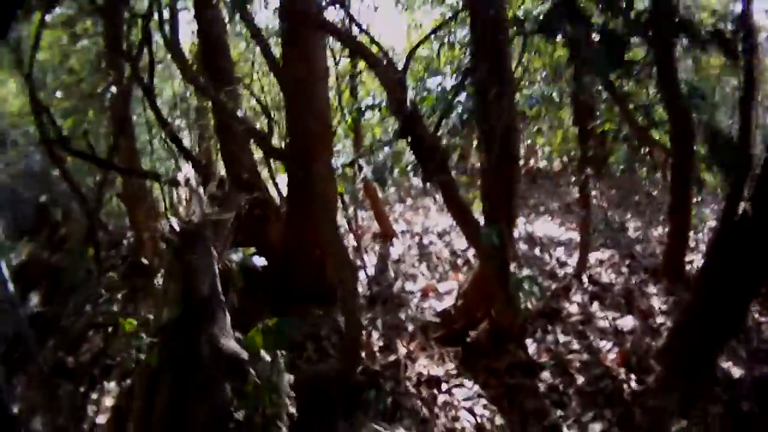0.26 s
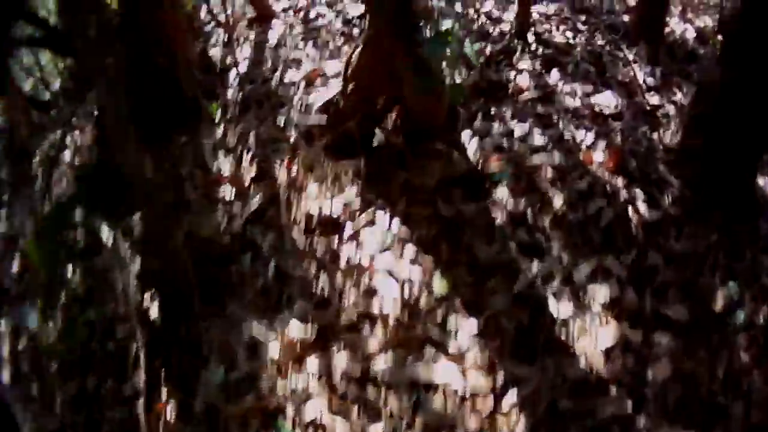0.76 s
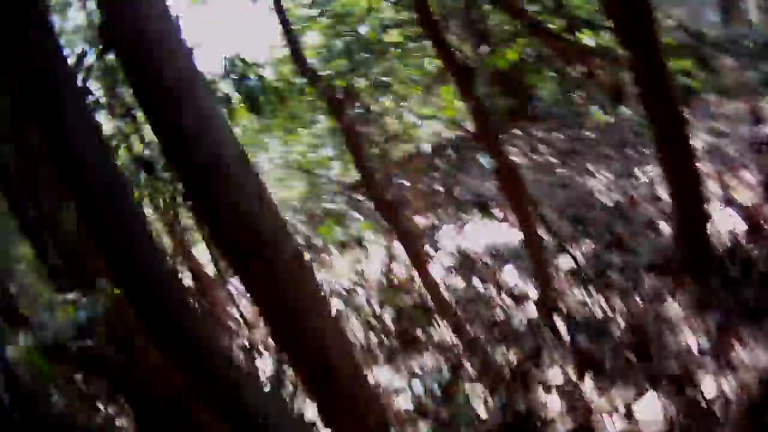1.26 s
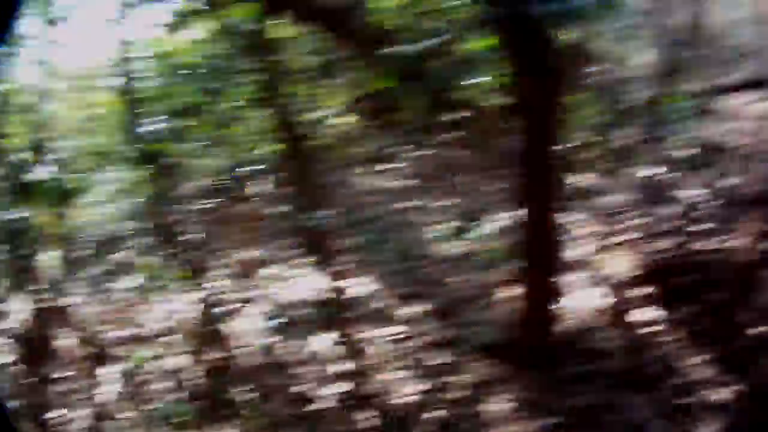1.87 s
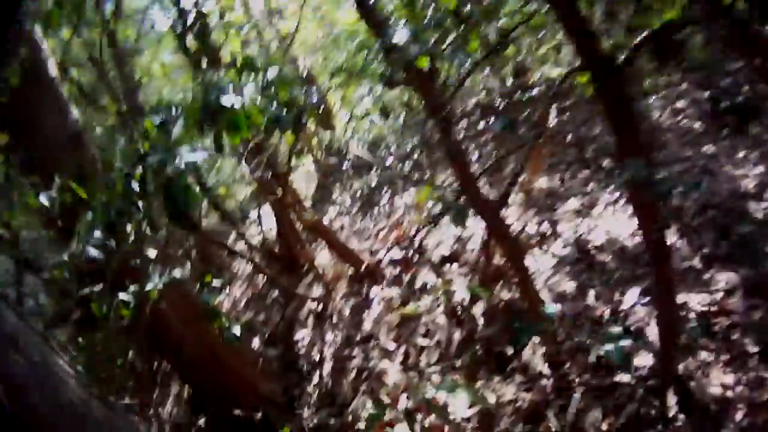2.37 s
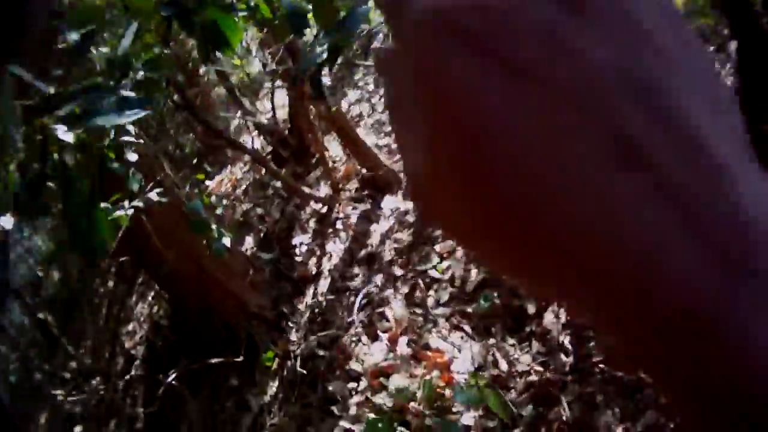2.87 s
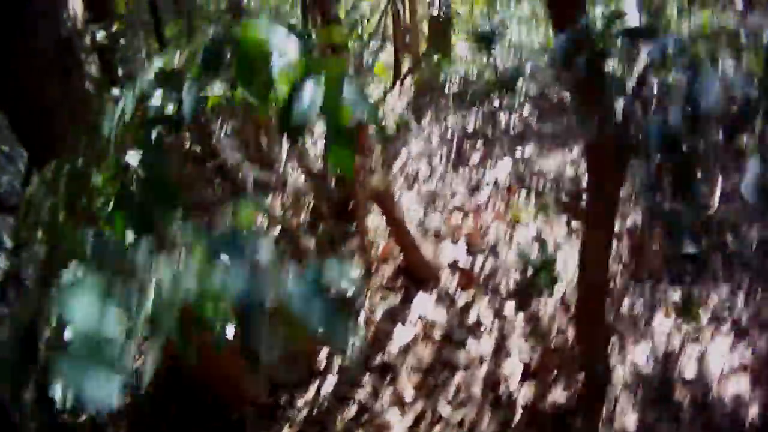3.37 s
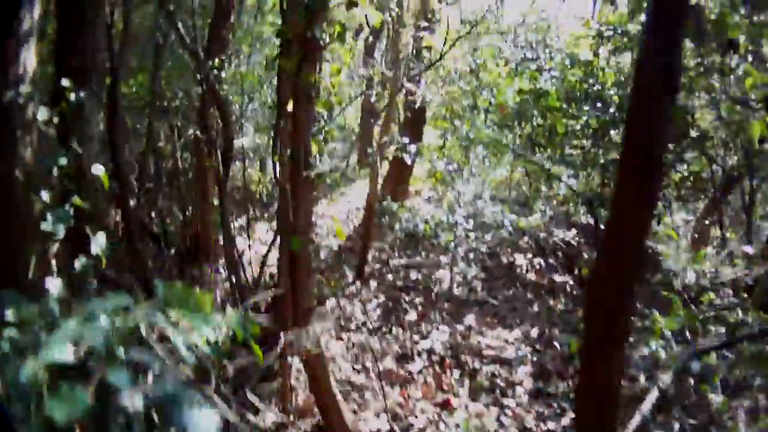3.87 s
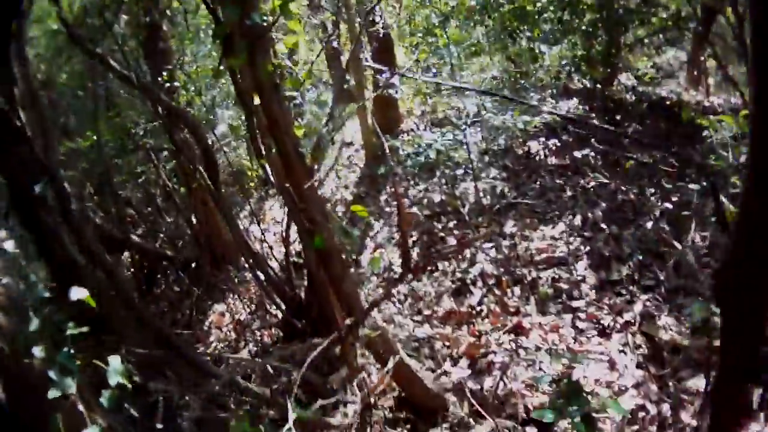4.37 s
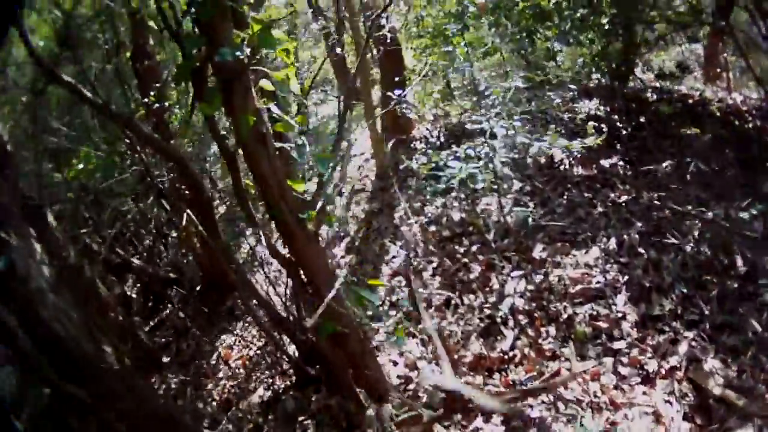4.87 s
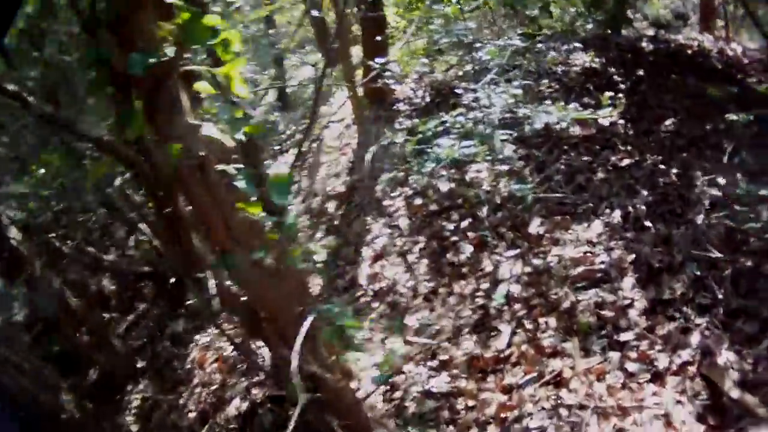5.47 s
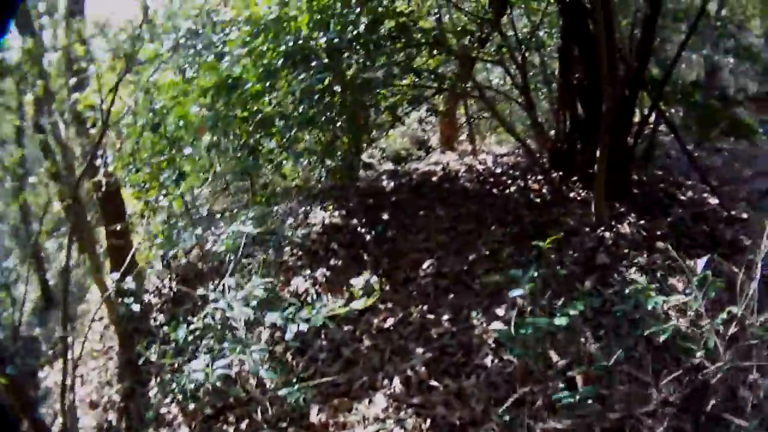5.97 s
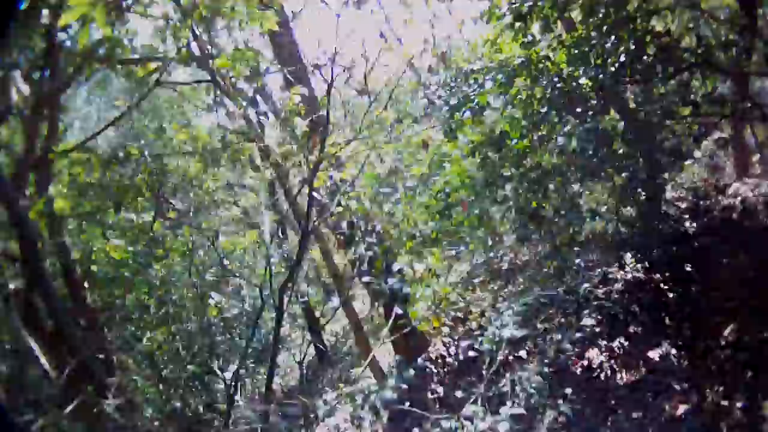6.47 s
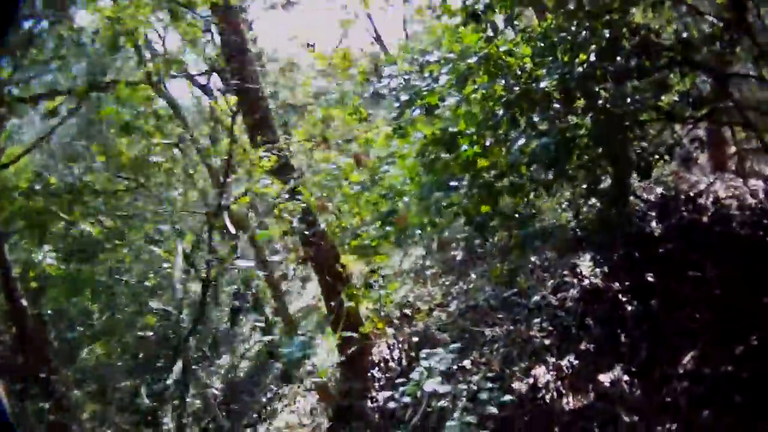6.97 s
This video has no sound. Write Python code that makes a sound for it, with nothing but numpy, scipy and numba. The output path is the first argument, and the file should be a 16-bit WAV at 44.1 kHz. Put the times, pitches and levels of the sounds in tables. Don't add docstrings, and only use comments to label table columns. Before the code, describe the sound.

Someone walks haltingly over crackling leaf litter, close up, as a twig breaks loudly, a stick knocks, and a bright stalk snaps later.

```python
import sys
import numpy as np
from scipy import signal
from scipy.fft import rfft, irfft
from scipy.io import wavfile
from scipy.ndimage import uniform_filter1d
from numba import njit

SR = 44100
rng = np.random.default_rng(int(sys.argv[2]) if len(sys.argv) > 2 else 0)


def transcribe(signal):
    frames = np.atleast_2d(signal).T
    limited = np.clip(frames, -1, 1)
    pcm = np.round(limited * 32767).astype(np.int16)
    wavfile.write(sys.argv[1], SR, pcm)


def volts(x):
    e = np.asarray(x, float) / 20
    return 10 ** e


N = 318679
HIT_SAMPLES = 2048


def band(x, lo_hz, hi_hz, order=2):
    edges_hz = [lo_hz, min(hi_hz, 0.45 * SR)]
    return signal.sosfilt(signal.butter(order, edges_hz, "bandpass", fs=SR, output="sos"), x)


def edge(x, hz, kind, order=4):
    return signal.sosfilt(signal.butter(order, hz, kind, fs=SR, output="sos"), x)


def ring(x, hz, width_hz):
    return signal.lfilter(*signal.iirpeak(hz, hz / width_hz, fs=SR), x)


def unit_rms(x):
    return x / np.sqrt(np.mean(x ** 2))


def set_peak(x, db):
    return x * volts(db) / np.max(np.abs(x))


def add(out, start_s, x):
    i = int(start_s * SR)
    out[i:i + len(x)] += x[:len(out) - i]


def walk(rate_hz):
    hold = int(SR / rate_hz)
    levels = np.repeat(rng.standard_normal(N // hold + 1), hold)
    return 1.28 * uniform_filter1d(levels, hold)[:N]


def curve(table):
    s, *columns = np.transpose(table)
    return [np.interp(np.arange(N) / SR, s, column) for column in columns]


def presses(rows, floor_db):
    ms = np.arange(N) / SR * 1000
    power = volts(floor_db) ** 2
    for s, db, rise_ms, hold_ms, fall_ms in rows:
        since = ms - 1000 * s
        rising = -since / max(rise_ms, 2)
        falling = (since - hold_ms) / max(fall_ms, 2)
        away = np.clip(np.maximum(rising, falling), 0, 12)
        power = power + volts(db - 10 * away) ** 2
    return np.sqrt(power)


def without_hold(rows):
    return [(s, db, rise_ms, 0, fall_ms) for s, db, rise_ms, fall_ms in rows]


@njit
def grains(start, hz, cycles, size):
    out = np.zeros(N + 4096)
    for g in range(len(start)):
        turn = np.exp((2j * np.pi - 1 / cycles[g]) * hz[g] / SR)
        z = size[g] + 0j
        for i in range(start[g], start[g] + min(int(6 * cycles[g] * SR / hz[g]), 4096)):
            z *= turn
            out[i] += z.imag
    return out[:N]


def crackle(count, spread_db, cycles):
    when, pitch, big, sign = rng.random((count, 4)).T
    hz = 200 * 78 ** pitch
    loud_db = np.minimum(-spread_db * np.log(big + 1e-9), 15)
    size = np.sqrt(hz) * volts(loud_db) * np.sign(sign - 0.5)
    return grains((when * N).astype(np.int64), hz, cycles * (0.5 + sign), size)


def colour(x, points):
    spectrum, f = rfft(x), np.arange(N // 2 + 1) * SR / N + 1
    own = np.sqrt(uniform_filter1d(np.abs(spectrum) ** 2, size=3000))
    hz, db = np.transpose(points)
    return irfft(spectrum / own * volts(np.interp(np.log(f), np.log(hz), db)), N)


# frequency in Hz, level in dB per Hz.
LEAF_TONE = [(71, -53), (120, -22), (412, -5.5), (725, -10.5), (1410, -4.5), (1590, -8), (1870, -6.5),
             (2640, -1.5), (4650, -3), (6690, -7), (7700, -9.5), (8520, -6.5), (15000, -7)]
# full weight in seconds, crunch in dB, rise by 10 dB in ms,
# hold in ms, fall by 10 dB in ms.
STEPS = [(0.471, -37, 29, 59, 33), (0.591, -48, 60, 16, 200), (0.934, -31, 16, -29, 88),
         (1.157, -31.5, -10, 45, 64), (1.19, -27.5, 13, 67, 31), (1.293, -42, 30, -4, 122),
         (2.035, -36, 26, 83, 55), (2.714, -41, 97, 6, 75), (3.033, -33.5, 29.5, 54, 18),
         (3.135, -48, 4, 36, 60), (3.193, -34, 67, 0, 190), (3.32, -34.5, 13, 0, 65),
         (3.496, -38.5, 196, 4, 400), (3.831, -30.5, 47, 25, 82), (3.911, -38.5, 60, 57, 200),
         (4.558, -32.5, 58, 1, 20), (4.629, -29, 54, 61, 90), (5.292, -41, 344, 3, 22),
         (5.476, -29.5, 22.5, 12, 150), (5.636, -26, 11, 1, 31), (3.44, -45, 33, -2, 20),
         (6.09, -36, 125, -2, 58), (6.335, -30, 99, 24, 83), (7.226, -37, 19, 0, 50)]
# peak in seconds, crunch in dB, rise by 10 dB in ms, fall by 10 dB in ms.
SCUFFS = [(0.208, -52, 300, 33), (0.275, -53, 17, 300), (0.83, -44, 400, 38), (1.094, -42, 40, 31),
          (1.86, -52.5, 126, 84), (2.2, -55.5, 60, 204), (2.57, -44.5, 261, 300), (4.182, -48, 150, 200),
          (4.454, -44.5, 300, 60), (4.8, -42, 43, 369), (5.795, -41.5, 132, 109), (5.915, -56, 27, 58),
          (6.665, -43.5, 64, 250), (6.936, -45.5, 250, 200), (7.056, -48, 63, 250)]
# time in seconds, rustle in dB, crisp share of thin leaves in dB.
RUSTLE = [(0, -67, -3), (0.25, -62, -0.5), (0.5, -42, -5.5), (0.95, -58, -5), (1.25, -39, -1.5),
          (1.45, -49, -5), (1.77, -53, -2.5), (1.96, -56.5, -1.5), (2.17, -46.5, -1), (2.9, -70, -4.5),
          (3.1, -75, 0), (3.85, -41.5, -1.5), (4.3, -47.5, -4.5), (4.7, -72, -2), (5.2, -40.5, -4),
          (5.85, -62, -2), (6.5, -44, -2.5), (7.23, -66, -2.5)]
# time in seconds, thump in dB, rise by 10 dB in ms,
# fall by 10 dB in ms.
SINKS = [(0.59, -55, 100, 58), (1.16, -50, 8, 30), (1.253, -37.5, 31, 14), (1.76, -51.5, 50, 147),
         (2.0, -53, 12, 150), (2.89, -51.5, 5, 120), (3.04, -65, 58, 97), (4.0, -47, 205, 110),
         (4.18, -39, 6, 64), (4.477, -38, 7, 31), (4.635, -39, 12, 15), (4.95, -63, 200, 300),
         (5.49, -43, 28, 107), (5.635, -39.5, 23, 57), (6.338, -40.5, 96, 127), (7.0, -58, 300, 300),
         (7.226, -48, 30, 47)]


def leaves():
    split_hz = 7500
    rustle_db, crisp_db = curve(RUSTLE)
    crunch = presses(STEPS + without_hold(SCUFFS), rustle_db)
    lone = unit_rms(colour(crackle(count=30000, spread_db=3.0, cycles=2.9), LEAF_TONE[:-1]))
    blur = unit_rms(colour(rng.standard_normal(N), LEAF_TONE[:-1]))
    slips = volts(1.38 * walk(60) + 1.0 * walk(150))
    bed = edge((lone + volts(3.0) * blur) * slips, 16500, "low", order=8)

    thump = unit_rms(band(bed, 82, 1596, order=3)) * volts(0.17 * walk(25))
    body = unit_rms(band(bed, 1730, split_hz, order=4))
    crisp = unit_rms(edge(bed, split_hz, "high")) * volts(crisp_db + 1.27)
    weight = np.hypot(volts(-14.5) * crunch, presses(without_hold(SINKS), floor_db=-60))
    return crunch * (body + crisp) + weight * thump


# frequency in Hz, width in Hz, level in dB.
WOOD = [
    (425, 244, 5),
    (1160, 1300, 2),
    (241, 210, 5),
    (750, 1600, -31),
]


def crack(hz, wood_db, crisp_db, swell_ms, decay_ms, after_db):
    ms = np.arange(HIT_SAMPLES) / SR * 1000
    decay_ms = np.clip(decay_ms, 0.2, 4)
    swell = np.exp(np.minimum(ms / swell_ms - 4, 0))
    late = np.maximum(ms - 4 * swell_ms, 0)
    fall = np.exp(-late / decay_ms) + volts(after_db) * np.exp(-late / 3.9)
    burst = swell * fall * rng.standard_normal(HIT_SAMPLES)

    broad_ring = ring(ring(burst, hz, 0.21 * hz), hz, 1.7 * hz)
    voice = set_peak(broad_ring, 0) + set_peak(band(burst, 1840, 5800), -1.3)
    modes = sum(volts(db) * ring(burst, f, width) for f, width, db in WOOD)
    wood = edge(modes, 306, "high", order=3)
    crisp = band(burst, 7000, 13800)
    return set_peak(voice, 0) + set_peak(crisp, crisp_db) + set_peak(wood, wood_db)


# time in seconds, peak in dB, ring in Hz, wood share in dB,
# crisp share in dB.
STALKS = [(0.5978, -19, 3550, -5.5, -13), (0.9276, -9.5, 5640, -12, -0.5), (1.3743, -23.5, 2260, -11, 7),
          (1.6625, -29, 5300, -14, -10), (1.998, -33.5, 1370, -0.5, -17), (2.5532, -21, 6000, -7, 6.5),
          (3.8322, -12, 7240, -37, 14), (3.9888, -21, 2940, -7.5, 4), (4.5484, -16, 5700, -38, -8),
          (4.6804, -15, 1220, -9, 3), (4.7288, -18, 5700, -3.5, -13), (5.5258, -18.5, 3790, -3, -3),
          (5.6333, 5, 3560, -17.5, -3.5), (5.9055, -12.5, 5650, -21, -1), (5.9133, -19, 6200, -17, -16),
          (6.4063, -30, 2350, 11, 2), (6.8464, -27, 5560, -8, -5)]
# time in seconds, peak in dB, ring in Hz, wood share in dB,
# crisp share in dB.
RIPS = [(0.7304, -26, 4220, -16, 3), (0.9312, -24.5, 5680, -2, -8), (1.0073, -19, 5700, -14, -3),
        (1.1535, -37, 4200, -22, 0), (2.156, -37, 5430, 4.5, 2), (2.2624, -45, 5770, 9.5, 2),
        (2.335, -28.5, 1260, -14, -6), (2.7423, -33, 3060, -28, 8), (3.9593, -19, 5850, -39, -7),
        (4.0455, -26, 5070, -8, 6.5), (4.296, -28, 2190, -22, 2.5), (4.4511, -36, 1220, -4, -18),
        (5.921, -32, 6200, -27, -13), (6.363, -18, 2960, -7, -7), (7.203, -25.5, 5000, -28, -6)]
# time in seconds, peak in dB, ring in Hz,
# wood share in dB, crisp share in dB.
CLICKS = [(0.629, -19.5, 3620, -23, 1), (0.9763, -21, 2660, -10, -5), (2.13, -21.5, 2050, -15, 6),
          (2.3283, -20.5, 2300, -17, 2), (2.9715, -36, 6500, -35, -7), (3.6338, -18.5, 6100, -36, -7),
          (4.8074, -24.5, 3520, -1, 5.5), (5.288, -12, 5400, -25, -9), (4.173, -23, 4600, -20, -14),
          (4.1437, -34, 3960, -30, -20), (4.2301, -40, 5600, -15, 12), (5.614, -23, 6300, -22, 5),
          (5.6635, -16, 6500, -14, -10)]
# time in seconds, peak in dB, ring in Hz, crisp share in dB.
TICKS = [(0.0664, -32, 4500, 2), (0.182, -33, 5000, 4.5), (0.2642, -37, 2160, 7), (0.3546, -30, 6600, -3),
         (0.484, -21, 7000, 2), (0.5736, -22, 3430, -9), (1.094, -32, 6900, 7), (1.8585, -29.5, 5130, 3),
         (2.186, -28, 2900, -13), (2.2135, -26.5, 3500, -17), (2.454, -27, 2450, -14),
         (3.744, -26, 6600, 9.5), (3.8512, -17, 6760, -34), (3.8825, -22.5, 6550, 14.5),
         (3.9225, -20, 5210, -2), (3.9697, -24, 6720, 7), (4.058, -19, 6680, 3), (4.1511, -34.5, 1720, 12),
         (4.712, -32, 3570, 6), (5.143, -26.5, 2150, -12), (5.2767, -19, 2950, -11), (5.4173, -24, 5380, 2),
         (5.5485, -25, 2650, -2), (5.8537, -26, 6200, -4), (5.8838, -30, 3200, -18),
         (5.929, -17.5, 5600, -29), (5.9515, -35, 5120, 6), (5.9924, -29, 6030, 5),
         (6.0153, -20.5, 6100, -1), (6.929, -30, 2350, 9.5)]
# time in seconds, peak in dB, ring in Hz, crisp share in dB.
TAPS = [(1.315, -27.5, 2730, -5), (1.3938, -30, 2700, -4), (1.61, -36, 5240, 2), (2.403, -39, 1320, 7),
        (4.0278, -29, 6070, 6), (5.7499, -33.5, 1880, 11), (5.7824, -32, 1880, -3), (6.1877, -34, 1410, 7),
        (6.6558, -28, 2470, 1), (6.8562, -31.5, 2460, 2), (7.167, -41, 1890, 9)]


def snaps():
    stalk_ms, rip_ms, click_ms, tick_ms, tap_ms = 1.53, 3.6, 0.55, 0.7, 1
    tick_wood_db, tap_wood_db = -20, -3
    rows = [(*row, stalk_ms) for row in STALKS]
    rows += [(*row, rip_ms) for row in RIPS]
    rows += [(*row, click_ms) for row in CLICKS]
    rows += [(s, db, hz, tick_wood_db, crisp_db, tick_ms) for s, db, hz, crisp_db in TICKS]
    rows += [(s, db, hz, tap_wood_db, crisp_db, tap_ms) for s, db, hz, crisp_db in TAPS]
    out = np.zeros(N)
    for s, db, hz, wood_db, crisp_db, decay_ms in rows:
        snap = crack(hz, wood_db + 0.38, crisp_db + 0.11, swell_ms=0.0787,
                     decay_ms=0.58 * decay_ms, after_db=-12.5)
        add(out, s - 0.0004, volts(db + 2.0) * snap)
    return out


# time in seconds, level in dB, rise by 10 dB in ms, hold in ms,
# fall by 10 dB in ms.
THUDS = [(0.45, -55, 70, 139, 46), (1.23, -47, 82, 3, 63), (2.22, -71.5, 400, 0, 100),
         (2.82, -52, 10, 30, 47), (3.84, -67, 120, 2, 150), (4.2, -68, 120, 0, 55),
         (4.74, -63.5, 350, 0, 75), (5.28, -77, 50, 0, 252), (5.64, -68, 220, 0, 140),
         (6.03, -76, 250, 0, 120), (6.36, -62, 76, 0, 55)]


def thuds():
    shake = band(rng.standard_normal(N), 28, 164)
    bounce = 0.27 * ring(shake, 59, 24)
    rumble = unit_rms((shake + bounce) * volts(0.96 * walk(16)))
    return presses(THUDS, floor_db=-76.5) * rumble


# (Hz, dB, seconds to fall 60 dB).
KNOCKS = [
    (1.483, -47, [(234, -7, 0.038)]),
    (1.752, -38, [(1290, 0, 0.026)]),
    (2.8179, -2.5, [(1195, 4, 0.026), (2160, -3, 0.015), (1530, 4.5, 0.011), (706, -28, 0.011), (360, -8.5, 0.038)]),
    (4.1714, -10.5, [(425, -0.5, 0.034), (620, -13, 0.12), (790, -1, 0.019), (1180, 5.5, 0.017), (1350, -13, .025), (2390, -1, 0.023), (3140, -6, 0.02)]),
    (5.289, -27.5, [(460, 3, 0.018), (263, -8, 0.022), (840, -8, 0.012)]),
]


def knocks():
    out, t = np.zeros(N), np.arange(HIT_SAMPLES) / SR
    for s, db, modes in KNOCKS:
        push = np.exp(-(t / 0.000222 - 2) ** 2)
        chatter = 0.29 * np.exp(-t / 0.0056) * rng.standard_normal(HIT_SAMPLES)
        blow = push + chatter
        rings = sum(set_peak(ring(blow, hz, np.log(1000) / np.pi / t60), mode_db) for hz, mode_db, t60 in modes)
        add(out, s, set_peak(rings, db))
    return out


# time in seconds, peak in dB, ring in Hz, wood share in dB, swell in ms.
TWIG = [
    (2.8175, -2, 4180, -19, 0.28),
    (2.8374, -5.5, 5330, 0, 1.8),
    (2.8505, -7.5, 5200, -2.5, 1.9),
    (2.861, -7.5, 5800, -7, 0.74),
    (2.864, -7.5, 3500, -16, 0.69),
    (2.884, -4, 5280, -15, 1.3),
]


def twig():
    out = np.zeros(N)
    for s, db, hz, wood_db, swell_ms in TWIG:
        decay_ms = 1.2 + 0.88 * swell_ms
        tear = crack(hz, wood_db, -18, swell_ms, decay_ms, after_db=-30)
        add(out, s - 4 * swell_ms / 1000, volts(db) * tear)
    return out


def trunk_echoes(hits):
    t = np.arange(6000) / SR
    tail = band(rng.standard_normal(6000), 410, 2700) * volts(-60 * t / 0.074) * (t > 0.003)
    return volts(-37.5) * signal.fftconvolve(hits, tail)[:N]


def scene():
    hits = snaps() + knocks() + twig()
    return (leaves() + thuds() + hits + trunk_echoes(hits))[None]


# frequency in Hz, width in Hz, depth from 0 to 1.
PORT_DIPS = [
    (3500, 1540, 0.4),
    (4710, 170, 1),
    (7500, 170, 0.73),
    (770, 460, 0.25),
]
# time in seconds, share of the dips from 0 to 1.
SHADE = [
    (0, 1.0),
    (1.9, .95),
    (2.4, 0.5),
    (4.0, 0.76),
    (5.5, 0.7),
    (7.23, 1),
]


def case_ports(x):
    shade = np.clip(curve(SHADE)[0], 0, 1)
    for hz, width_hz, depth in PORT_DIPS:
        x = x - shade * np.clip(depth, 0, 0.95) * ring(x, hz, width_hz)
    return x


def low_pass(x):
    return signal.sosfilt(signal.butter(12, 16480, fs=SR, output="sos"), x)


def record(dry):
    x = case_ports(edge(dry, 13600, "low", order=3))
    ceiling = 0.64
    x = x / (1 + np.abs(x / ceiling) ** 8) ** 0.125
    steep_top = signal.ellip(10, 0.5, 40, 15280, fs=SR, output="sos")
    x = signal.sosfilt(steep_top, x)
    return low_pass(x)


dry = scene()
out = record(dry)
transcribe(out)
```